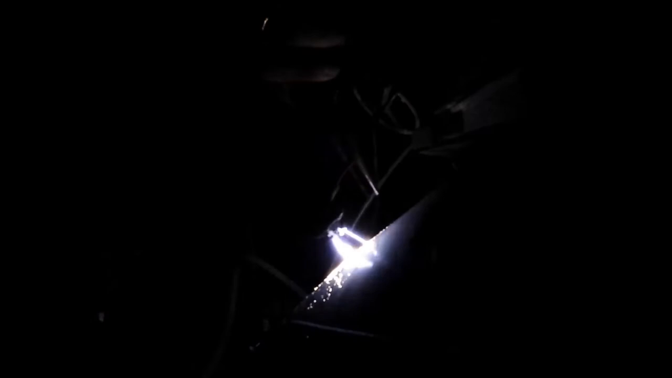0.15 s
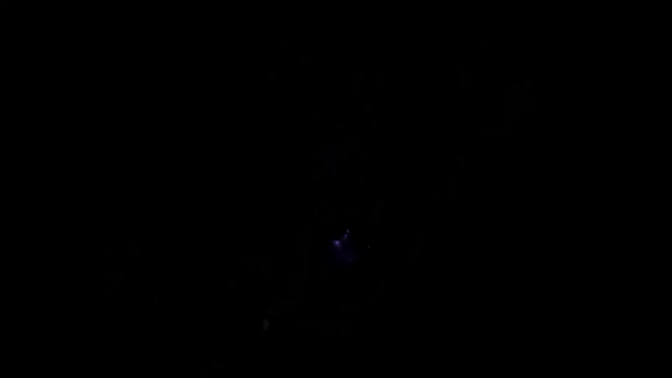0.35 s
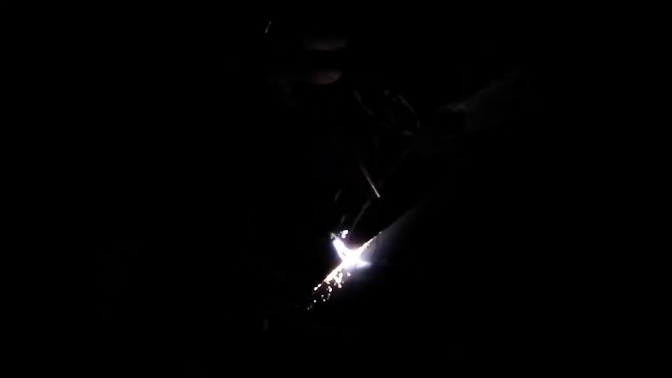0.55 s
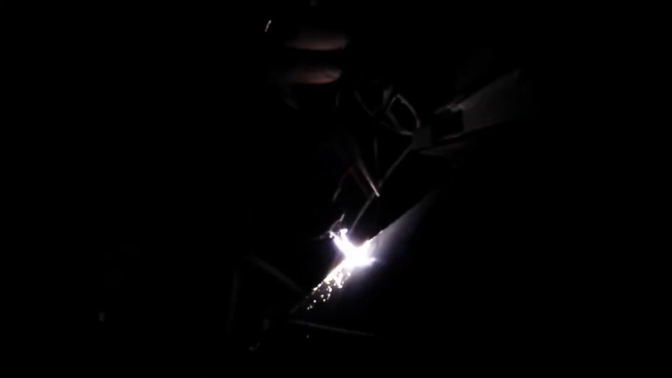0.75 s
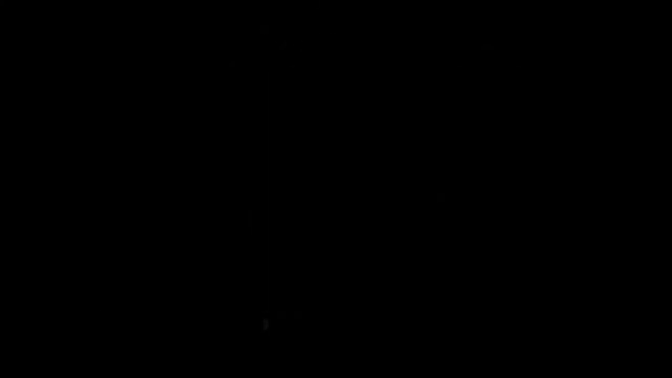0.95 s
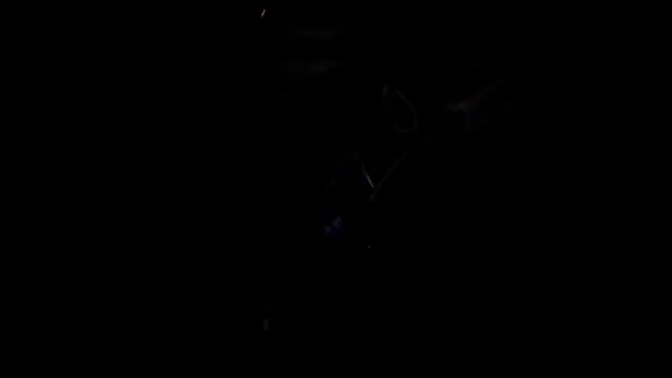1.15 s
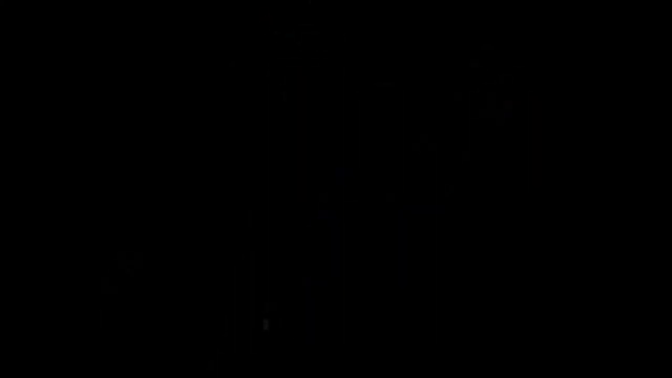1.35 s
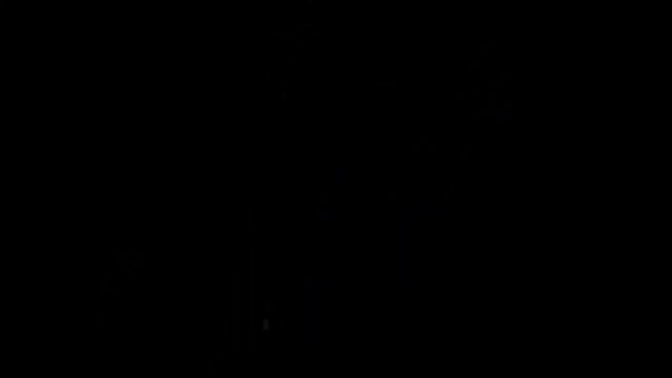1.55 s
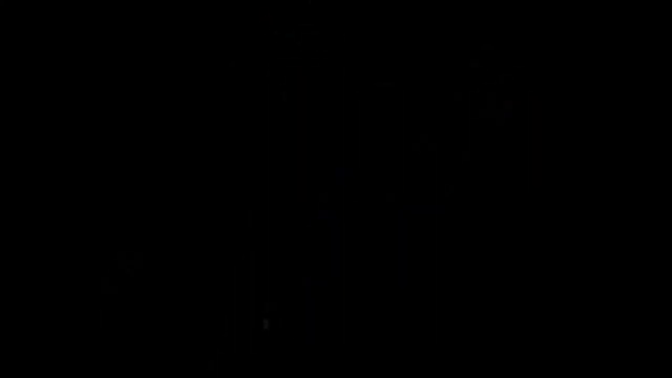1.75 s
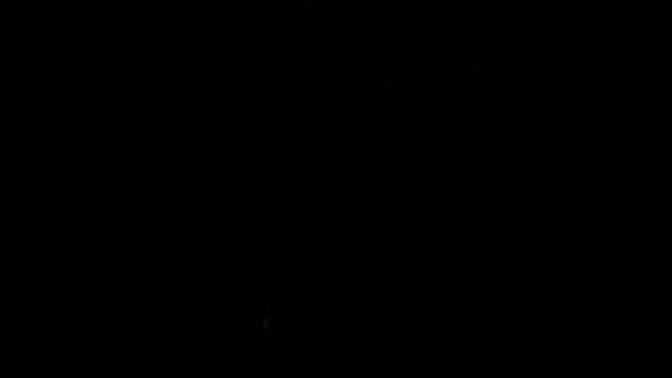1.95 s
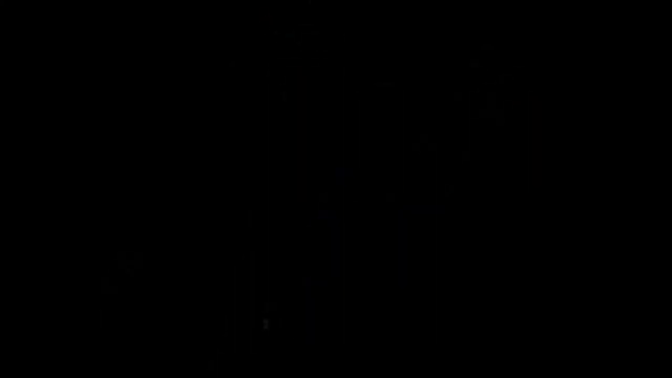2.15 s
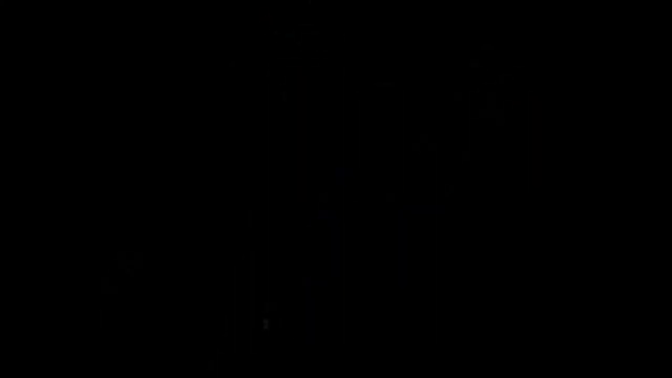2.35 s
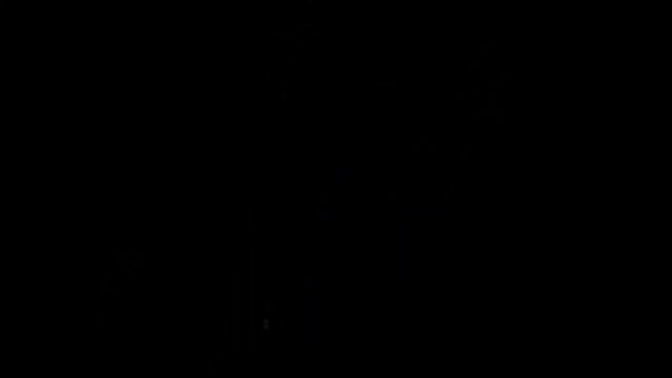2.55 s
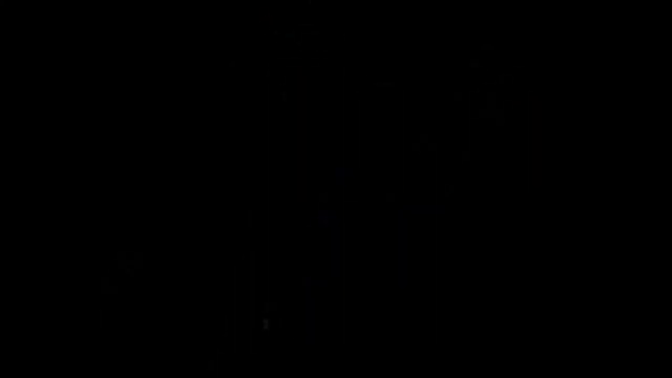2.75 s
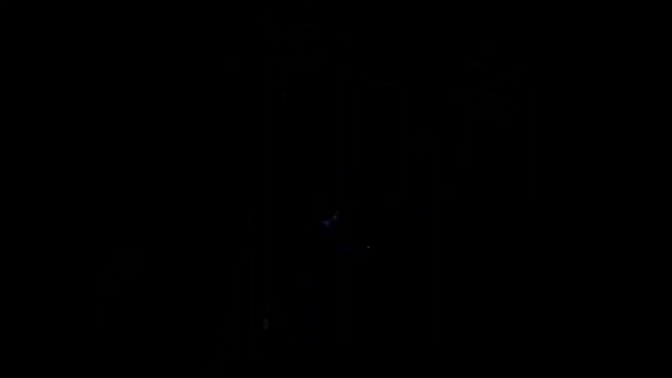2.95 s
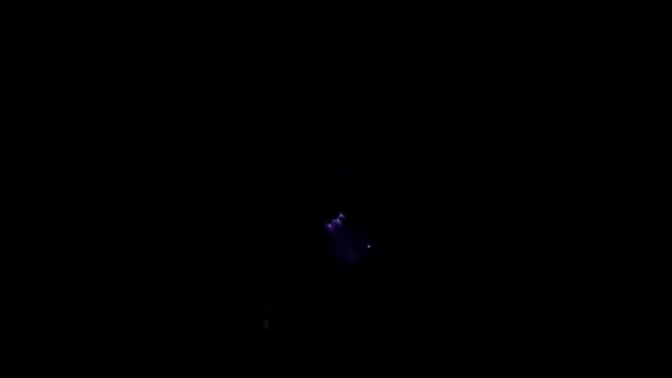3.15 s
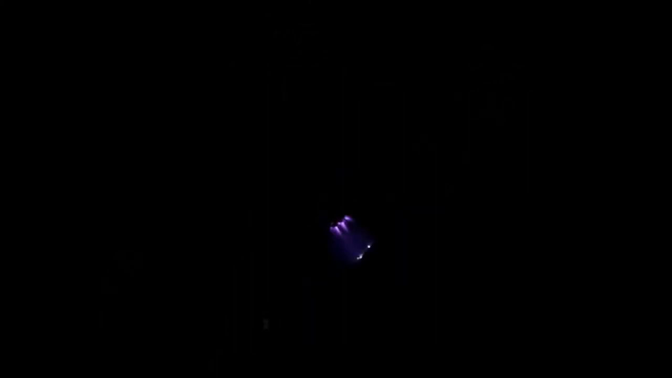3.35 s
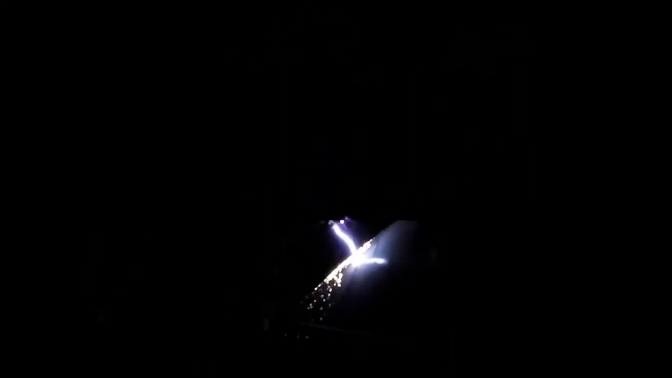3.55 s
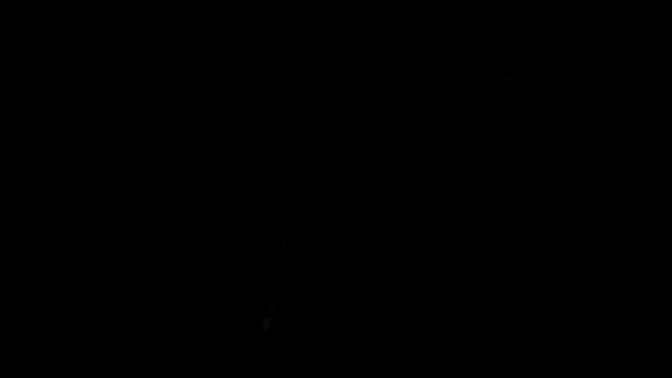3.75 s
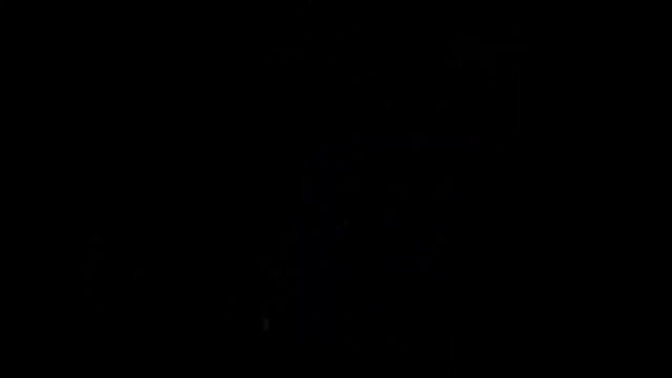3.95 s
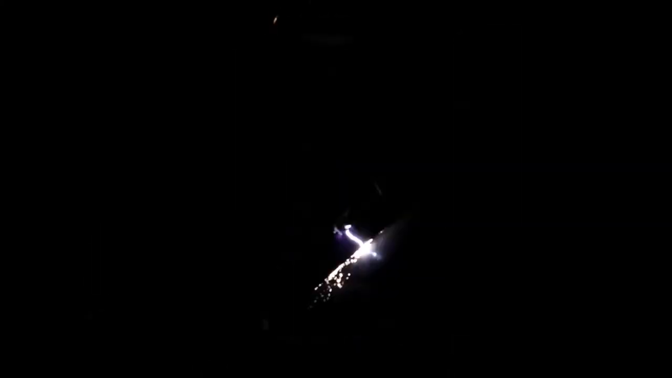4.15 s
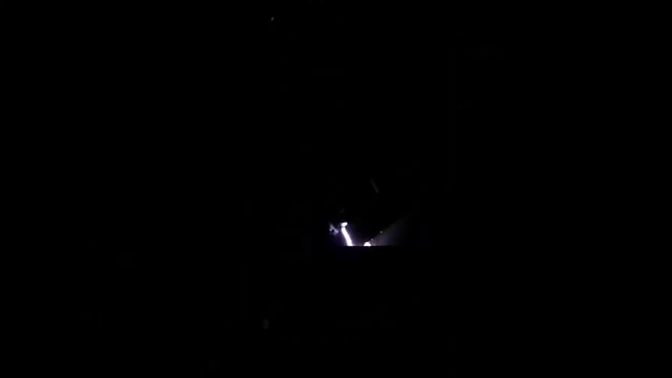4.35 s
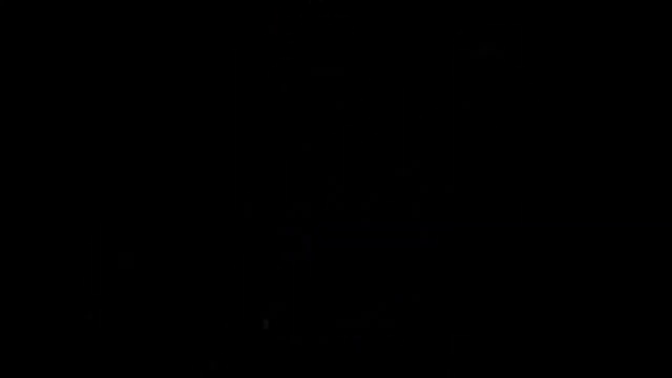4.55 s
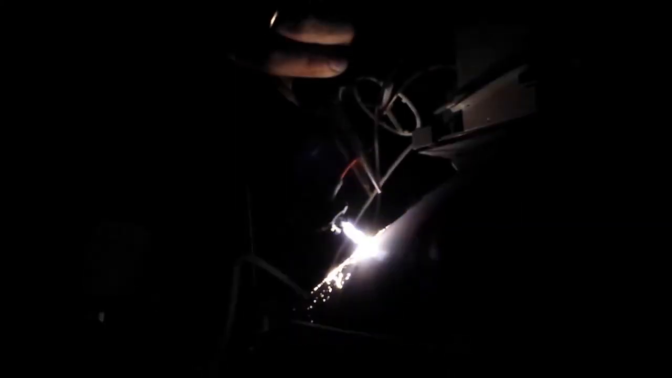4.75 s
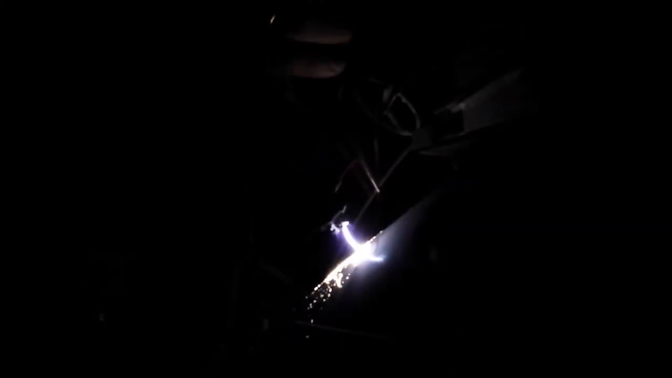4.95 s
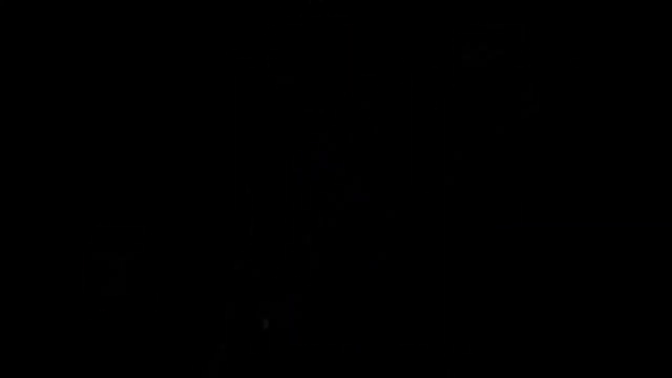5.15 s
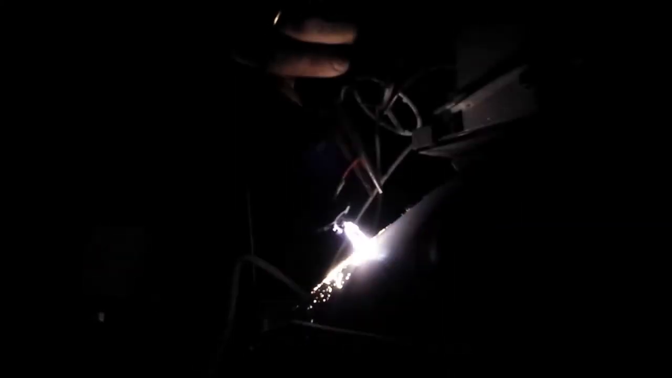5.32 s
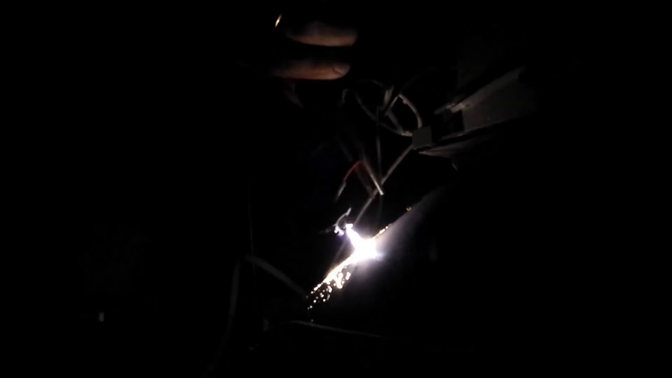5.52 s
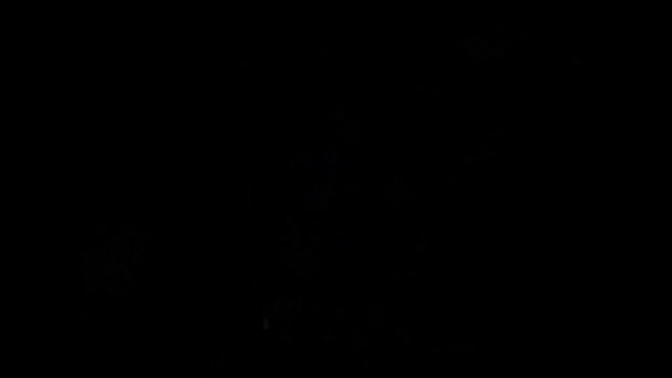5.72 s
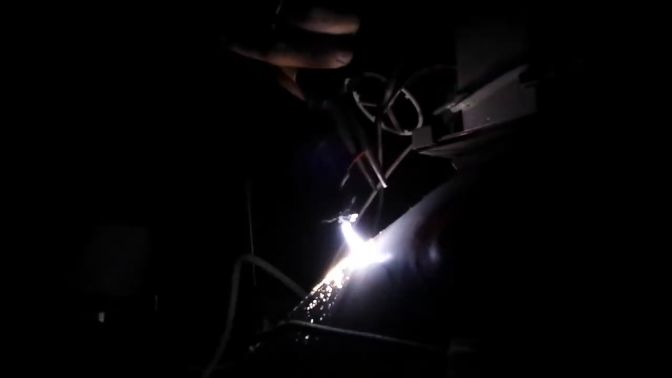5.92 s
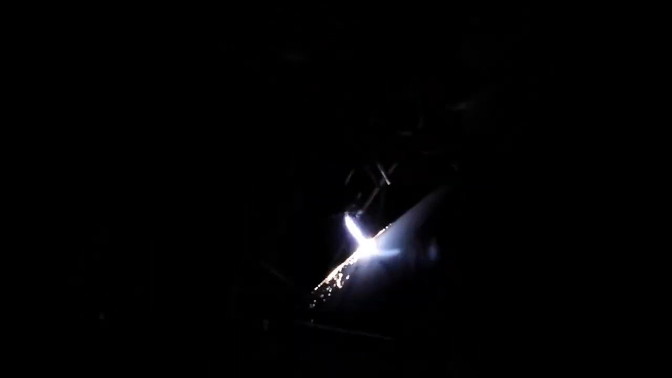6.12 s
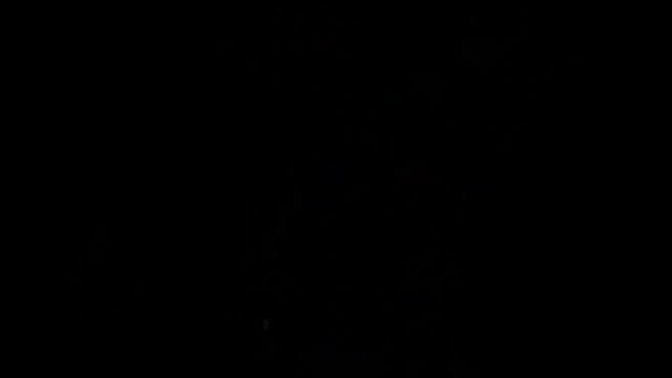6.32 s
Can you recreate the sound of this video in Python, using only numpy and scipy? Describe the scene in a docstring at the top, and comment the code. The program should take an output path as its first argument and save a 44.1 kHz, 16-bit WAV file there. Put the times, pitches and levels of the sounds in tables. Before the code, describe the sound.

Faint low hum and soft hiss in a quiet little room are broken by violent electric crackling. Three quick paired zaps come first, then a pause, a swelling electrical fizz, and five more paired bursts. Each begins with a tiny fizz, snaps hard into dense bright ticks and rings about half a second. Electrical jolts add thumping, popping, clipped distortion to the close stereo microphones.

```python
"""A high-voltage transformer draws electric arcs in a small, quiet room with a faint hum and hiss.
The room still rings from an earlier burst at the start; three short bursts follow, then a quiet stretch.
A corona then sputters alight and grows brighter until it strikes; five more bursts follow, then quiet.
Each arc swells up as a fizz, snaps and burns as a dense stream of tiny ticks, prolonged by the walls.
Each arc also jolts the microphone inputs electrically and drives them into crackling overload."""
import sys
import numpy as np
from scipy import signal
from scipy.fft import rfft, irfft, next_fast_len
from scipy.io import wavfile
from scipy.ndimage import uniform_filter1d, map_coordinates

SR = 44100
rng = np.random.default_rng(int(sys.argv[2]) if len(sys.argv) > 2 else 0)


def output_pcm(signal):
    """Save a mono or channel-first signal as 16-bit PCM at the path in sys.argv[1].

    Samples are clipped to [-1, 1] before scaling.
    """
    pcm = np.clip(np.atleast_2d(signal).T, -1, 1) * 32767
    wavfile.write(sys.argv[1], SR, np.round(pcm).astype(np.int16))


N = 285768  # length in samples
EARLY = SR // 2  # begin half a second early, so the room is already ringing at time zero
TIME = np.arange(-EARLY, N) / SR  # seconds


def amp(db):
    """Turn decibels into a gain."""
    return 10 ** (np.asarray(db) / 20)


def unit(x):
    """Scale to rms 1."""
    return x / np.sqrt(np.mean(x ** 2) + 1e-20)


def along(points, hz):
    """Read a curve given as (Hz, value) points, joined by lines on a log frequency axis."""
    point_hz, values = np.transpose(points)
    return np.interp(np.log(hz + 1), np.log(point_hz + 1), values)


def bell(hz, centre, width):
    """A smooth bump of height 1."""
    return np.exp(-((hz - centre) / width) ** 2)


def filtered(x, response):
    """Multiply the spectrum of x by a response that depends on frequency."""
    length = x.shape[-1]
    size = next_fast_len(length + SR // 2)  # padding keeps the end from wrapping onto the start
    hz = np.fft.rfftfreq(size, 1 / SR)
    return irfft(rfft(x, size) * response(hz), size)[..., :length]


def coloured(x, spectrum, tilt):
    """Give stereo sound a spectrum and a left-right balance, at rms 1."""
    def response(hz):
        balance = np.outer([.5, -.5], along(tilt, hz))
        return amp(along(spectrum, hz) + balance)
    return unit(filtered(x, response))


def wobble(rate):
    """A smooth random curve through `rate` random points a second."""
    points = rng.standard_normal(int(len(TIME) * rate / SR) + 4)
    return map_coordinates(points, [np.arange(len(TIME)) * rate / SR])


# The steady tones of the hum. Each row: frequency in Hz, peak level in dB before the hum's overall trim.
HUM = [(161.5, -62.5), (204.6, -65.5), (247.6, -60), (323.0, -69.5), (489.9, -63), (689.1, -71.5)]
# The colour of the hiss. Each row: frequency in Hz, relative level in dB per Hz.
FLOOR = [(15, -50), (25, -8), (101, -10), (129, -24.5), (152, -8.5), (246, -16), (289, -14), (322, -11.5),
         (457, -21), (495, -11), (537, -16.5), (782, -22), (2700, -25.5), (4040, -13.5), (15500, -23)]
# The balance of the hiss. Each row: frequency in Hz, left minus right in dB.
FLOOR_TILT = [(500, 2), (2000, -2.5), (4300, -5), (6500, 8), (9000, 14.5), (15000, 6.5)]


def background(hum_trim_db, hiss_db, waver):
    """A faint hum of sine tones, whose phases drift by about `waver` radians, over an even hiss."""
    hum = sum(amp(db) * np.sin(2 * np.pi * hz * TIME + waver * wobble(4.14)) for hz, db in HUM)
    hiss = coloured(rng.standard_normal((2, len(TIME))), FLOOR, FLOOR_TILT)
    return amp(hum_trim_db) * hum + amp(hiss_db) * hiss


# The bursts; each is an arc, a short lull and a second arc.
# Each row: strike time in seconds, first arc length in seconds, lull in seconds,
# second arc length in seconds, fizz lead before the first arc in seconds, jolt of the first arc in dB.
BURSTS = [(-.44, 0.11, 0.053, 0.11, .02, -4), (.104, 0.045, .062, 0.13, .028, 3.5),
          (.579, 0.049, .040, 0.19, 0.018, 0.5), (1.053, 0.044, 0.08, 0.047, 0.0062, 1),
          (3.452, 0.14, .084, 0.021, .006, -3), (4.08, 0.14, .055, 0.13, 0.068, -1),
          (4.683, .180, .036, .138, 0.043, 1), (5.308, 0.1, .041, 0.2, 0.027, 3),
          (5.856, 0.25, .075, .055, 0.019, -0.5)]
FIRST_ARC_DB, SECOND_ARC_DB = -3.5, -5.5  # level of the spark stream
SECOND_LEAD_S = 0.036  # fizz before every second arc
SECOND_JOLT_DB, JOLT_DB_PER_S = -11, 57  # a second arc jolts harder the longer it lasts


def arcs():
    """List the two arcs of every burst: (strike s, end s, fizz lead s, spark level dB, jolt dB)."""
    for strike, first, lull, second, lead, jolt_db in BURSTS:
        yield strike, strike + first, lead, FIRST_ARC_DB, jolt_db
        restrike = strike + first + lull
        second_jolt_db = SECOND_JOLT_DB + JOLT_DB_PER_S * second
        yield restrike, restrike + second, SECOND_LEAD_S, SECOND_ARC_DB, second_jolt_db


def ticks(rate, scatter_db, max_lag_s):
    """Tiny discharges of uneven size; each strikes elsewhere, so its delay between the ears differs."""
    count = int(rate * len(TIME) / SR)
    when, place = rng.random((2, count))
    sizes = amp(scatter_db * rng.standard_normal(count))
    shifts = np.outer([1, -1], place - .5) * max_lag_s * SR
    arrivals = when * len(TIME) + shifts
    return np.array([np.bincount(ear.astype(int) % len(TIME), sizes, len(TIME)) for ear in arrivals])


def wander(x, patchy_db):
    """The arc's channel keeps changing shape, so patches of its spectrum swell and fade."""
    grid = signal.stft(x, nperseg=512)[2]
    patches = rng.standard_normal(grid.shape[1:])
    patches = uniform_filter1d(patches, size=4, axis=0)  # smooth over frequency
    patches = uniform_filter1d(patches, size=12, axis=1)  # smooth over time
    patchy = signal.istft(grid * amp(patchy_db * unit(patches)), nperseg=512)[1]
    return unit(patchy[:, :x.shape[1]])


# The colour of the spark stream. Each row: frequency in Hz, relative level in dB per Hz.
SPARK = [(290, -22.5), (650, -16.5), (1200, -12.5), (2000, -10), (2800, -2), (3700, -3), (5300, 1),
         (7000, 1.5), (8700, -1), (10200, -5.5), (13000, -5), (15500, -7)]
# The balance of the spark stream. Each row: frequency in Hz, left minus right in dB.
TILT = [(500, -1), (2500, -2), (4500, -2.5), (6800, -1.5), (9000, 6.5), (11500, 5.5), (15000, 3.5)]


def sparks(fizz_db, swell_db, linger_s, flicker_db, snap_db, snap_s):
    """A stream of ticks swells up as fizz to each strike, snaps on, burns and dies after the arc breaks."""
    level = np.zeros(len(TIME))
    for strike, end, lead, db, _ in arcs():
        swell = fizz_db - swell_db * ((strike - TIME) / lead) ** 2
        snap = snap_db * np.exp(-np.abs(TIME - strike) / snap_s)
        fall = -20 * np.maximum(TIME - end, 0) / linger_s
        shape = np.where(TIME < strike, swell, snap)
        level = np.maximum(level, amp(db + shape + fall))
    stream = coloured(ticks(rate=1400, scatter_db=3.5, max_lag_s=.0003), SPARK, TILT)
    return level * amp(flicker_db * wobble(90)) * wander(stream, patchy_db=2)


STRIKE_S = 0.0031  # how fast the extra kick of a strike dies away


def jolts(rate, relax_s, level_db, scatter_db, strike_db):
    """Each restrike throws an input to a new voltage, which relaxes; an arc kicks hardest at its start."""
    strength = np.zeros(len(TIME))
    jumps = rng.random(len(TIME)) < rate / SR
    for strike, end, _, _, db in arcs():
        burning = (TIME >= strike) & (TIME < end)
        kick = strike_db * np.exp(-(TIME[burning] - strike) / STRIKE_S)
        strength[burning] = amp(db + level_db + kick)
        jumps[np.searchsorted(TIME, strike)] = True
    signs = rng.choice([-1, 1], len(TIME))
    voltage = strength * signs * amp(scatter_db * rng.standard_normal(len(TIME)))
    # for every moment, the index of the latest jump
    last = np.maximum.accumulate(np.where(jumps & (strength > 0), np.arange(len(TIME)), 0))
    return voltage[last] * np.exp(-(TIME - TIME[last]) / relax_s)


def pickup(coupling_hz, slew_hz, surge_db):
    """Each input catches its own rounded jolts and sharp, surging spikes through a coupling capacitor."""
    swings = np.array([jolts(rate=180, relax_s=0.07, level_db=-3.0, scatter_db=3.0, strike_db=1.5)
                       for _ in range(2)])
    spikes = np.array([jolts(rate=340, relax_s=0.00009, level_db=2, scatter_db=7.5, strike_db=6.5)
                       for _ in range(2)])
    rounded = filtered(swings, lambda hz: slew_hz / (slew_hz + 1j * hz))
    wires = rounded + spikes * amp(surge_db * wobble(50))
    return filtered(wires, lambda hz: (1j * hz / (coupling_hz + 1j * hz)) ** 2)


# The colour of the full-grown corona, before its rasp. Each row: frequency in Hz, relative level in dB per Hz.
FIZZ = [(290, -41), (500, -29.5), (1010, -23.5), (1900, -19.5), (2290, -10), (2930, -15.5), (3100, -29),
        (3480, -8.5), (5130, -7), (6830, -8.5), (7670, -19), (8600, -9.5), (10500, -18), (13400, -17.5),
        (15500, -26)]
# The balance of the corona. Each row: frequency in Hz, left minus right in dB.
FIZZ_TILT = [(500, 2), (2000, -4), (4000, -2), (6500, -7), (8500, 13.5), (11000, 13), (15000, 12.5)]
CORONA_START_S, CORONA_END_S = 2.717, 3.448  # one slow build-up before a strike
CORONA_START_DB, CORONA_DB_PER_S = -29.5, 17.5  # its level once alight, and its steady growth
CATCH_DB, SPUTTER_DB, CATCH_S = -17, 8, 0.035  # its weak, sputtering start, and how fast that fades


def corona(flicker_db, widen, rasp_hz):
    """Before the gap breaks down, thin streamers sputter, then fizz; growing, they gain treble and rasp."""
    age = np.clip(TIME, CORONA_START_S, CORONA_END_S) - CORONA_START_S
    level = CORONA_START_DB + CORONA_DB_PER_S * age
    catching = np.exp(-age / CATCH_S) * (CATCH_DB + SPUTTER_DB * wobble(200))
    alight = (TIME > CORONA_START_S) & (TIME < CORONA_END_S)
    fizz = coloured(ticks(rate=3200, scatter_db=0.5, max_lag_s=.0004), FIZZ, FIZZ_TILT)

    def treble_and_rasp(hz):
        return 1 / (1 + (10000 / (hz + 1)) ** 12) + bell(hz, rasp_hz, 425)
    # held back at first, these bands reach full strength when the corona is loudest
    held_back = amp(widen * (level - level.max())) - 1
    fizz = fizz + filtered(fizz, treble_and_rasp) * held_back
    return alight * amp(level + catching + flicker_db * wobble(70)) * fizz


# How long the room rings. Each row: frequency in Hz, time to fade by 60 dB in seconds.
ROOM = [(300, 0.44), (2000, 0.5), (5000, 0.46), (9000, 0.45), (15000, 0.28)]


def room(x, direct_db, walls_db, walls_t60, tail_db):
    """The direct sound, a quick colourless scatter off nearby surfaces and a diffuse fading tail."""
    hz, t, grid = signal.stft(rng.standard_normal((2, SR * 3 // 4)), SR, nperseg=256)
    fade = amp(-60 * t / along(ROOM, hz)[:, None])
    tail = signal.istft(grid * fade, SR, nperseg=256)[1]
    t = np.arange(tail.shape[1]) / SR
    scatter = rfft(rng.standard_normal(tail.shape) * amp(-60 * t / walls_t60))
    colourless = scatter / uniform_filter1d(np.abs(scatter), size=500)
    walls = irfft(colourless, len(t)) * (t < walls_t60)
    answer = amp(tail_db) * tail / np.linalg.norm(tail[0])
    answer += amp(walls_db) * walls / np.linalg.norm(walls[0])
    answer[:, 0] += amp(direct_db)
    return signal.fftconvolve(x, answer, axes=1)[:, :len(TIME)]


def ports(x, notch_hz, width_hz, depth_db, ring_hz, ring_width_hz, ring_db):
    """The microphone ports weaken one narrow band and boost another."""
    def response(hz):
        boost = ring_db * bell(hz, ring_hz, ring_width_hz)
        return amp(boost - depth_db * bell(hz, notch_hz, width_hz))
    return filtered(x, response)


def scene():
    """Add the discharge in the room, the background and the electrical pickup."""
    discharge = sparks(fizz_db=-6.5, swell_db=23.0, linger_s=0.017, flicker_db=2.5, snap_db=1.5, snap_s=0.012)
    discharge = discharge + corona(flicker_db=0.5, widen=0.62, rasp_hz=2300)
    air = room(discharge, direct_db=-4.0, walls_db=-4.5, walls_t60=0.023, tail_db=-3.0)
    air = air + background(hum_trim_db=0.5, hiss_db=-45.9, waver=.15)
    air = ports(air, notch_hz=3280, width_hz=350, depth_db=3.5, ring_hz=5124, ring_width_hz=260, ring_db=3.0)
    sound = air + pickup(coupling_hz=3.3, slew_hz=345, surge_db=1.5)
    return sound[:, EARLY:]


def record(dry, top=0.83, hardness=8, band_limit_hz=15750):
    """The inputs saturate towards `top`; then nothing above the band limit is kept."""
    clipped = dry / (1 + np.abs(dry / top) ** hardness) ** (1 / hardness)
    return filtered(clipped, lambda hz: hz < band_limit_hz)


dry = scene()
out = record(dry)
output_pcm(out)
```